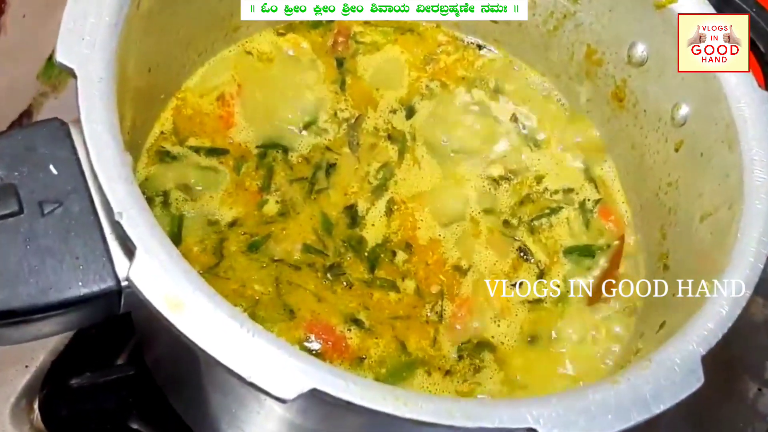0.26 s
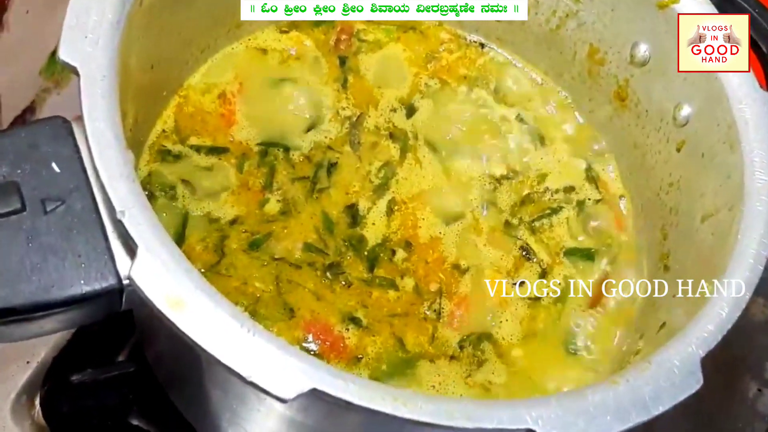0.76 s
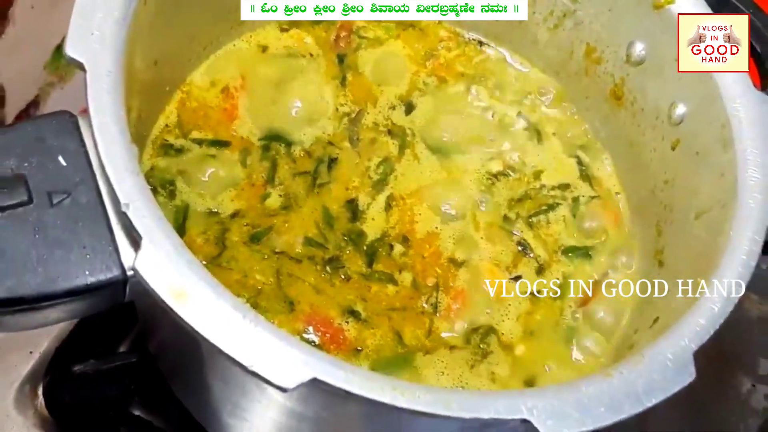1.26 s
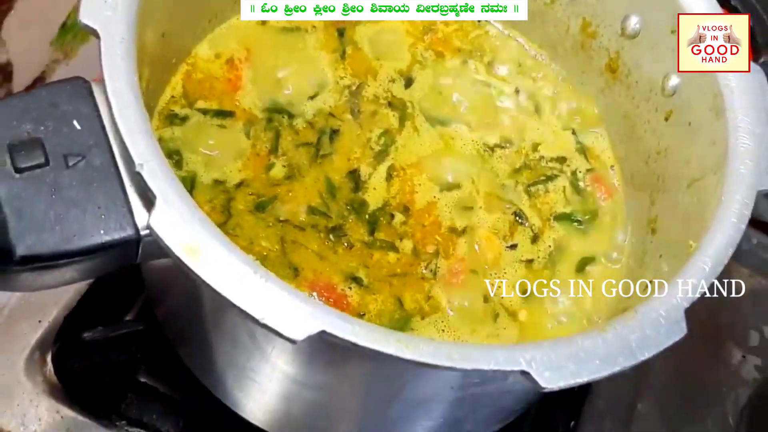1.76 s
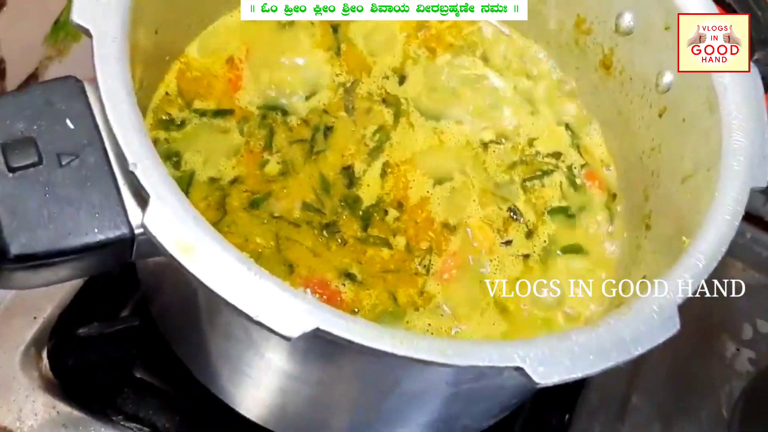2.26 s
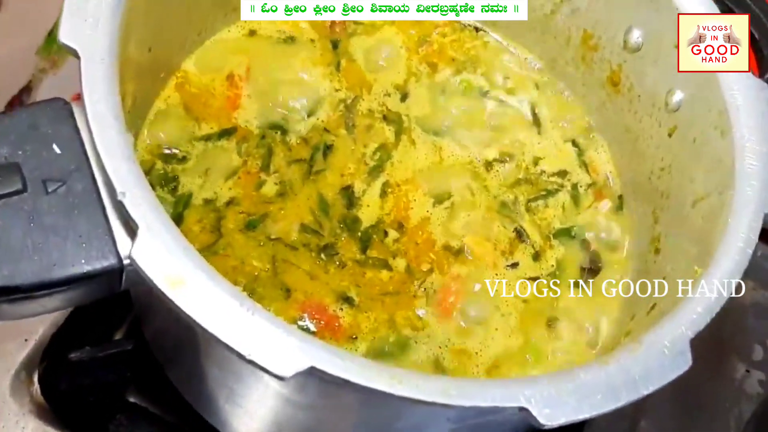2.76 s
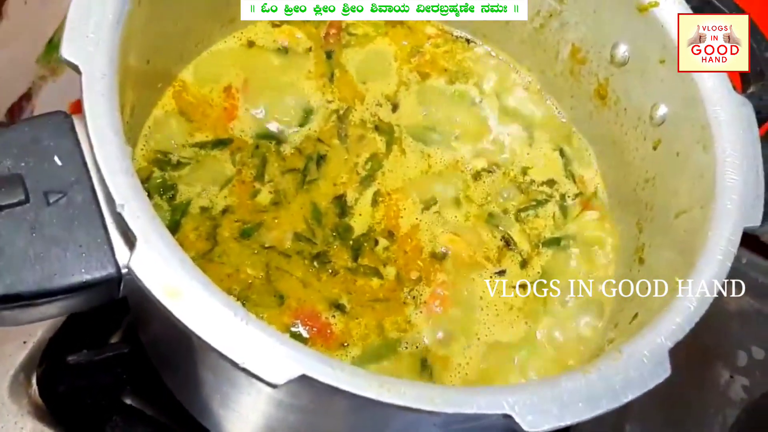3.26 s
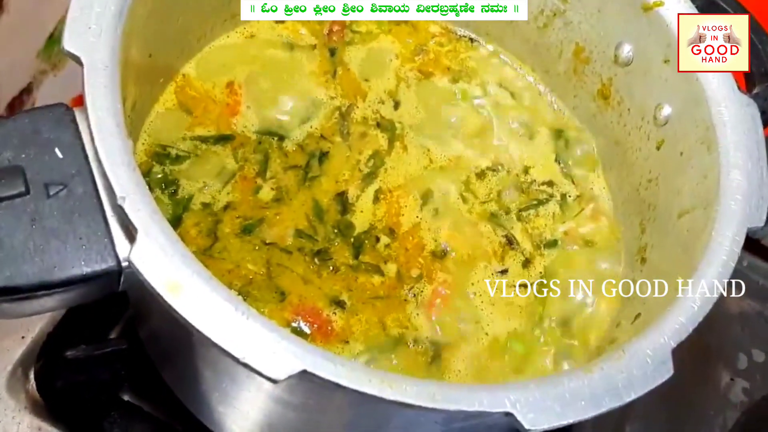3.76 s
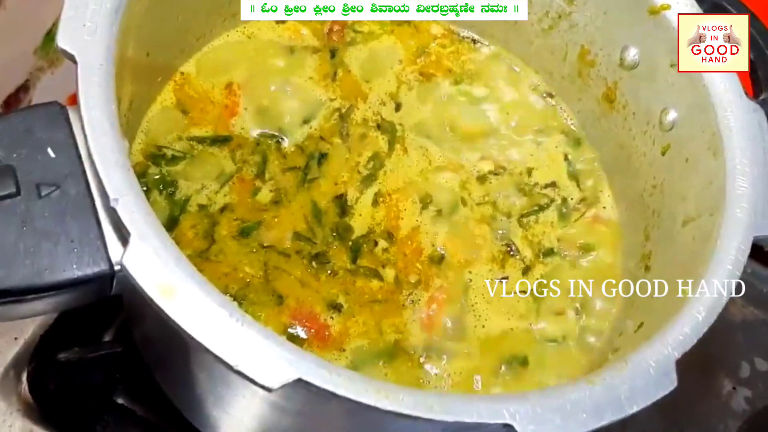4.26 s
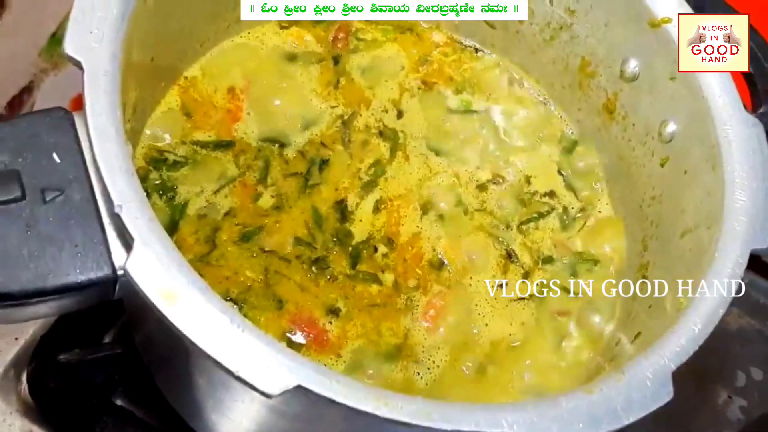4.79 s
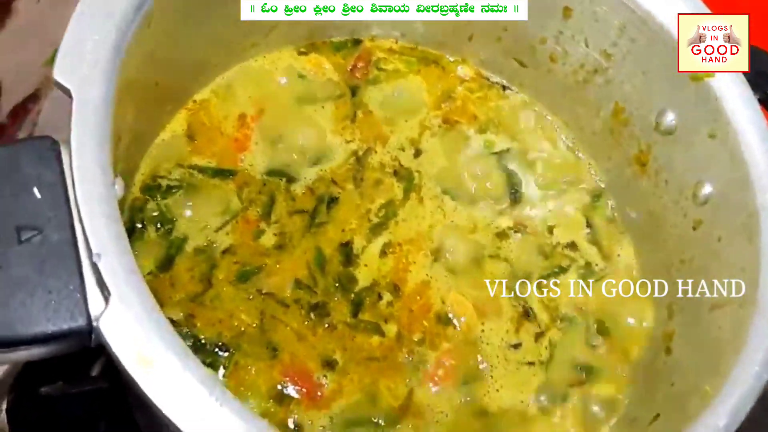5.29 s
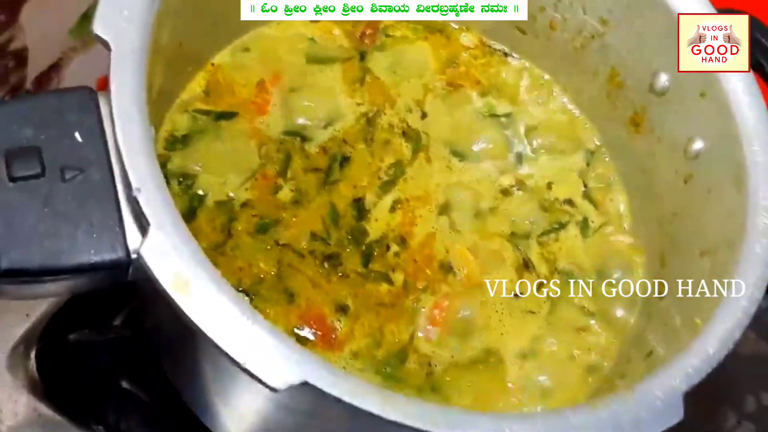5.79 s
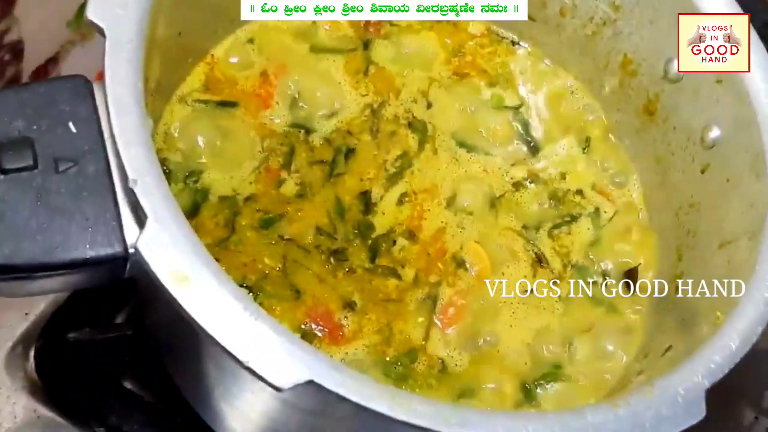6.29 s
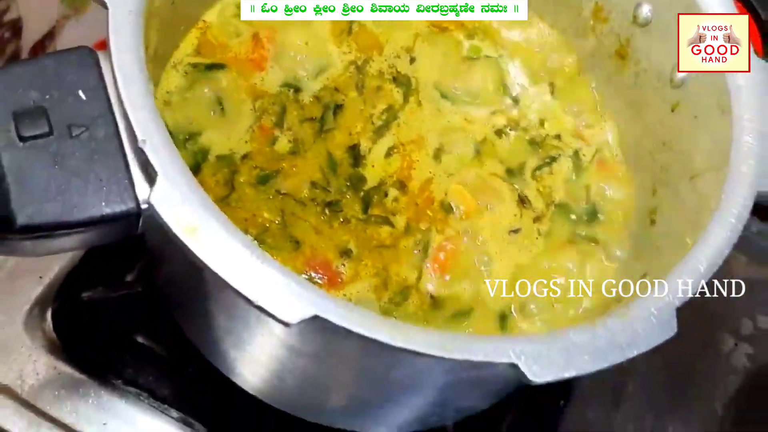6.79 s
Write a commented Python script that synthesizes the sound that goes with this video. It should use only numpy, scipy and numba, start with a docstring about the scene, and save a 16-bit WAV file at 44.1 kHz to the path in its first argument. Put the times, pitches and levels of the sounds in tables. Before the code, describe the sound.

Close up, thick soup bubbles in an open metal pot: hollow mid-pitched pops, rounded plops and tiny bright ticks, dense and irregular, with fine spatter. A faint gas and steam hiss and low rumble lie beneath. A light scrape comes at about one and a half seconds, a loud metallic clack near three, a softer knock shortly after and another around four and a half. Small dry kitchen, stereo phone.

```python
"""In a kitchen, thick soup simmers in an open metal pot under a phone with two microphone ports.
Bursting bubbles ring the air in the pot, middling ones plop and small ones tick, as rising decaying sines.
Drops spatter as short puffs of noise; a gas flame and steam hiss as flickering noise over a far rumble.
Nearby something is knocked and dragged: rattling noise in five registers, and ringing kitchenware modes."""
import sys
import numpy as np
from scipy import signal
from scipy.fft import rfft, irfft
from scipy.io import wavfile
from scipy.ndimage import uniform_filter1d
from numba import njit

SR = 44100
rng = np.random.default_rng(int(sys.argv[2]) if len(sys.argv) > 2 else 0)


def pcm_store(signal):
    """Save signal as 16-bit PCM."""
    levels = np.round(np.clip(np.atleast_2d(signal), -1, 1) * 32767)
    wavfile.write(sys.argv[1], SR, levels.astype(np.int16).T)


N = 310419
TIME = np.arange(N) / SR
FREQ = np.fft.rfftfreq(N, 1 / SR) + 1  # 1 Hz is added so that the logarithm stays finite

# How the scene swells and fades: start_s, rumble_db, boil_db
SWELL = [(0.0, -45.5, 1.5), (0.23, -49.5, 0.5), (1.31, -50.5, 2.5), (1.49, -50, 5.5), (2.08, -49.5, -1),
         (2.25, -51, 3), (3.04, -47.5, 3), (3.18, -54, 3), (3.29, -51, 6), (3.84, -50.5, 2),
         (4.29, -47.5, 3), (4.45, -47.5, 5), (5.0, -46.5, 6), (5.16, -48.5, 5.5), (5.65, -48.5, 1.5),
         (6.08, -52, 1), (6.68, -47, 3), (7.04, -51.5, 2)]

# Colour of the flame and steam hiss: pitch_hz, relative_level_db
HISS_COLOUR = [(150, -42), (250, -10), (519, -4.5), (775, -2), (1120, -26), (1550, -10.5), (1820, -21),
               (7440, -29.5), (7980, -30), (8550, -48.5), (11100, -29.5), (16000, -32)]
HISS_DB = -45.5
# Room modes that colour the far rumble: pitch_hz, width_hz, relative_level_db
RUMBLE_MODES = [(83, 74, 1.5), (152.3, 5.7, -6), (229.3, 29, 2.5)]
# How alike the noise is at the two ports: pitch_hz, correlation
LIKENESS = [(60, 0.97), (500, 0.88), (900, 0.83), (1400, 0.04), (15000, 0.016)]
# How the noise leans to the left: pitch_hz, left_minus_right_db
NOISE_LEAN = [(60, -1), (400, 3), (1300, 3), (2500, 9.5), (5000, 2), (9000, -3), (15000, 2.5)]

# Big bubbles: start_s, first_mode_db, then relative to it low_gulp_db, second_mode_db, bright_snap_db
BIG_BUBBLES = [(0.0075, -15, -16, -17, -13.5), (0.0141, -18, -5.5, 5.5, -8.5),
               (0.2638, -19, -24, -4.5, -14), (0.2828, -18, -12, -11, -33), (0.4235, -24, -21, -10, -16),
               (0.5166, -23, -19, -29, -30), (0.571, -40, -11, 18.5, -1), (0.5919, -15, -27, -14, -11.5),
               (0.7856, -29.5, 0, -1, -0.5), (0.8213, -19.5, -28, -11, -31), (0.8321, -30.5, -2, 17.5, 4.5),
               (0.846, -22, -13, -34, -36), (0.9273, -21, -28, 4, -13), (0.949, -20, -18, -9, -18),
               (1.1332, -22, -4, -15, -22), (1.1847, -25.5, 3.5, 5.5, -12), (1.2145, -23.5, -11, -21, -26),
               (1.3824, -20.5, -18, -27, -34), (1.3953, -27, -26, 11, -3), (1.4135, -18.5, -35, -27, -37),
               (1.4576, -21.5, -16, -16, -28), (1.482, -21, -21, -19, -31), (1.9849, -22, -20, -21, -25),
               (2.0862, -26.5, -4, 6, -2), (2.3756, -26, -16, 21, -1), (2.4934, -21, -27, -36, -44),
               (2.609, -32, -19, 9.5, -2), (2.634, -17, -23, 2.5, -13.5), (2.763, -39.5, -18, 12, 1),
               (3.0805, -25, -32, -3, -19), (3.3714, -22.5, -7, -14, -29), (3.6095, -19.5, -5, -13, -28),
               (3.6904, -24, -11, -12, -16), (3.8884, -24, -25, -1.5, -14), (4.0002, -17.5, -22, -10, -29),
               (4.0148, -15.5, -24, -11, -22), (4.0871, -20, -7, -8.5, -15.5), (4.229, -22, -10, -29, -34),
               (4.2455, -26.5, -22, 9, 1), (4.2521, -28, -20, 6.5, -6), (4.3205, -22, -2, -7, -24),
               (4.4275, -22, -29, -26, -28), (4.4343, -28.5, -16, 6.5, -11), (4.5897, -19.5, -3, -15, -28),
               (4.7438, -12, -13, -21, -23), (4.8092, -22, -25, -25, -34), (4.84, -16, -23, 11, -5.5),
               (4.8542, -22.5, -21, 8, -4), (4.9955, -19.5, -22, -11, -29), (5.0033, -13, -22, -9, -26),
               (5.1349, -19.5, -9, -14, -16), (5.6574, -25.5, -3.5, -7, -10), (5.6926, -14, -19, -19, -24),
               (6.0125, -22, -8, -13, -24), (6.0203, -17.5, -21, -17, -20), (6.056, -25.5, -10, 5.5, -5),
               (6.073, -28, -19, -7, -12), (6.1265, -21.5, -4, -4, -15), (6.216, -31, -16, -21, -26),
               (6.2504, -17, -2.5, -16, -29), (6.2565, -19, -18, -22, -29), (6.4388, -31, 10, 0, -13),
               (6.4495, -23, -22, -10, -25), (6.471, -22, 3.5, -17, -27), (6.6026, -25, -13, 8.5, -8),
               (6.7105, -32, -12, 6, -1), (6.8345, -23.5, -29, 0, -9), (6.9706, -23.5, -3, -25, -30),
               (6.9981, -28, 6.5, -11, -14)]
# Modes of the air in the pot, before scatter:
# pitch_hz, t60_s, relative_level_db (left port), left_minus_right_db, right_lag_rad
POT_MODES = [(769.2, 0.031, -3, 2.5, 0.41), (829, 0.055, -15.5, 7, 0.26), (976, 0.005, -7, 6.5, 0.04),
             (437, 0.025, -5, 1.5, 0.61), (550.6, 0.032, -6, 8.5, 1.5), (1480, 0.009, -4, 9.5, 3.87),
             (1540.4, 0.044, -3.5, 13, 3.7), (1772, 0.0043, -8, 1, 0.95), (1298, 0.026, -2.5, 32, 0.47),
             (2037, 0.049, -7, 8, 0.62), (2440, 0.014, 0.5, 18, 1.4), (2767, 0.019, -8.5, 8, 0.89)]
# Group of each pot mode: 0 first mode, 1 low gulp, 2 second mode, 3 bright snap
MODE_GROUP = [0, 0, 0, 1, 1, 2, 2, 2, 3, 3, 3, 3]
# How much each group's modes scatter from burst to burst (half as much for big bubbles): scatter_db
MODE_SCATTER_DB = [2, 3, 2.5, 5]
SIMMER_PER_S = 220
BURST_RISE_S, SIMMER_RISE_S = 0.005, 0.0098  # t60 of the push: strong bursts break sharply, weak ones softly
SOFT_DB, SHARP_DB = -26, -13  # burst levels between which the push shortens
DETUNE, DAMPING_DB = 0.013, 1  # the heaving surface shifts pitch (fraction) and decay from burst to burst

# Sizes of spattering drops, coarse to fine: low_hz, high_hz, random_puff_db, t60_s
DROP_SIZES = [(1900, 4330, -59.5, 0.087), (2900, 5540, -63.5, 0.067), (4870, 10900, -64, 0.016)]
# Fine spits of drops on the hot wall: start_s, peak_db
SPITS = [(0.073, -32.5), (0.1032, -34), (0.176, -33), (0.321, -37), (0.421, -32), (0.683, -32),
         (1.8851, -34), (2.151, -40), (2.48, -31), (2.5275, -32.5), (2.5666, -35), (3.3972, -33.5),
         (3.648, -32), (3.7806, -35.5), (4.3016, -33), (4.6748, -36.5), (4.764, -31.5), (5.005, -37),
         (5.0265, -30.5), (5.678, -35), (5.926, -32), (6.0412, -35.5), (6.3395, -28.5)]
# Drops relative to the tick they come with: other_sizes_db, same_size_db
TICK_SPRAY_DB = [-15.5, -13.5]
RANDOM_PUFFS_PER_S, PUFF_RISE_T60_S = 30, 0.0043
SPIT_CREST_DB = 8  # peak of a spit above its rms

# Middling bubbles that plop: start_s, level_db (midway between ports), starting_pitch_hz
PLOPS = [(0.5908, -23.5, 1070), (0.9238, -24.5, 1290), (2.0858, -19.5, 1330), (2.3762, -31, 1470),
         (2.6316, -32, 1420), (4.2522, -21, 1080), (4.837, -16.5, 920), (6.0192, -27, 940),
         (6.6009, -20, 1020)]
PLOP_S, PLOP_GLIDE, PLOPS_PER_S = 0.0026, 0.11, 43  # glide: fraction of pitch gained in one PLOP_S

# Small bright bubbles: start_s, level_db (midway between ports), starting_pitch_hz
TICKS = [(0.9705, -37.5, 5400), (1.0425, -35, 2280), (1.098, -36.5, 3980), (1.841, -32, 2420),
         (1.8663, -36, 3300), (2.2838, -34.5, 3500), (2.554, -33.5, 4360), (2.624, -34, 2760),
         (3.1092, -30.5, 2400), (3.569, -39.5, 5240), (4.16, -36.5, 2580), (4.2845, -35, 2360),
         (4.3485, -37, 2550), (4.6632, -35, 2400), (4.76, -35, 4530), (4.785, -33.5, 2400),
         (4.821, -36, 2780), (4.901, -32, 2330), (4.9928, -32, 2130), (5.025, -34.5, 4630),
         (5.05, -41, 3920), (5.1562, -37.5, 3190), (5.456, -35, 2400), (5.5335, -32, 2390),
         (5.9444, -35.5, 2410), (5.963, -34.5, 2420), (6.0975, -40, 3170), (6.137, -42, 4050),
         (6.225, -40, 2870), (6.327, -36, 3200), (6.6296, -37.5, 4600), (6.792, -38.5, 4020)]
FIZZ_PER_S = 260
TICK_PAN_DB, TICK_PAN_SPREAD_DB = 9, 9  # left minus right

# Dragging strokes: start_s, length_s, rasp_db, brightness_db_per_register, ring_db, rubbed_pitch_hz
DRAGS = [(1.424, 0.097, -48.5, 1, -57, 3330), (1.473, 0.081, -40.5, 1.5, -48, 3000),
         (1.53, 0.06, -43.5, 1, -39.5, 3120), (1.561, 0.065, -35.5, -1, -42, 2400),
         (1.595, 0.072, -47.5, -1, -54, 3800), (1.658, 0.046, -44.5, -4, -51, 2080),
         (1.683, 0.036, -52, -4, -51, 3500), (3.216, 0.047, -40.5, -2.5, -52, 3300),
         (6.372, 0.079, -56.5, -2.5, -45, 1670), (6.376, 0.12, -54, 0, -46.5, 2700),
         (6.432, 0.12, -54, 0.5, -54, 1640)]
# Colour of the rasp: thud_db, body_db, middle_db, upper_middle_db, treble_db
DRAG_COLOUR_DB = [-11.5, -7.5, -1, -3.5, -8]
STROKE_PEAKINESS = 1.28  # power on the half-sine swell of a stroke

# Knocks and their bounces, as rattle: start_s, level_db, base_t60_s, brightness_db_per_register
KNOCKS = [(2.9517, -11.5, 0.18, 3), (3.012, -34, 0.17, -1), (3.252, -25, 0.16, 0),
          (4.518, -17.5, 0.095, 4.5), (4.555, -39, 0.091, 4.5)]
# Colour of a knock: thud_db, body_db, middle_db, upper_middle_db, treble_db
KNOCK_COLOUR_DB = [-11.5, -11, -5, -9.5, -14.5]
# Factor on the base t60, so that lows last and treble fades sooner: one factor per register
RING_LONGER = [2.26, 1.26, 1.06, 1.2, 1.05]
KNOCK_RISE_PER_T60 = 0.046

# Single blows within the clatter: start_s, level_db, struck_pitch_hz
BLOWS = [(2.9298, -34.5, 2570), (2.956, -18.5, 510), (2.9605, -34, 2300), (2.9635, -11.5, 4430),
         (2.968, -13.5, 2370), (2.974, -16, 4300), (2.982, -19.5, 560), (2.9973, -30, 3600),
         (3.0162, -26, 3500), (3.021, -31, 1700), (3.033, -36, 3300), (3.047, -35, 3300),
         (3.063, -43, 4900), (3.2412, -39, 3320), (3.254, -23.5, 522), (3.2565, -17, 1350),
         (3.26, -27, 2090), (3.264, -38, 3300), (3.276, -28.5, 1900), (3.292, -36, 545),
         (4.5213, -22.5, 555), (4.5245, -12.5, 3250), (4.527, -17, 2050), (4.533, -24, 1650),
         (4.538, -21, 1340), (4.556, -29, 550), (4.563, -38, 2980)]
# Kitchenware modes: pitch_hz, width_hz, relative_level_db
WARE_MODES = [(439.7, 5.4, 0), (545, 34, 2.5), (1360, 40, -6.5), (1648, 30, 2.5), (2047, 16, -7),
              (2106, 46, 3), (2350, 31, 2.5), (2796, 25, 1.5), (3360, 51, 4.5), (3630, 82, -3),
              (4010, 66, 1), (4170, 39, -8.5), (4440, 39, -1.5), (5060, 96, -16)]
BLOW_OCTAVES, BLOW_SCATTER_DB = 0.17, 1  # reach around the struck pitch; scatter of each mode from blow to blow
WARE_PAN_DB, WARE_RING_DB = 9.5, -11  # left minus right; ringing against the rattle
RATTLE_ALIKE = 0.5  # share of the rattle that reaches both ports alike

# Dips of the microphone ports: pitch_hz, width_hz, depth (0 to 1)
PORT_DIPS = [(8440, 830, 1), (9210, 1370, 0.52)]
LEFT_LAG = 7  # samples by which near sounds reach the left port later
ROOM_T60_S, ROOM_DB = 0.062, -10.5
TOP_HZ = 15500


def undb(db):
    """Decibels to amplitude."""
    return 10 ** (np.asarray(db) / 20)


def unit(x):
    """Scale to an rms of one."""
    return x / np.sqrt(np.mean(x ** 2))


def decay_rate(t60):
    """Loss per sample of a sound that falls by 60 dB in t60 seconds."""
    return np.log(1000) / (t60 * SR)


def on_log(table):
    """Read a table of pitch and value at every frequency bin, on a logarithmic pitch scale."""
    hz, value = np.transpose(table)
    return np.interp(np.log(FREQ), np.log(hz), value)


def band(x, lo_hz, hi_hz):
    """Keep one band of a sound."""
    return signal.sosfilt(signal.butter(2, [lo_hz, hi_hz], "band", fs=SR, output="sos"), x)


def ring(x, hz, t60):
    """One decaying mode, complex so that each port can take its own phase."""
    return signal.lfilter([1], [1, -np.exp(2j * np.pi * hz / SR - decay_rate(t60))], x)


def walk(rate):
    """Random levels held for 1 / rate seconds, then smoothed twice."""
    hold = int(SR / rate)
    steps = np.repeat(rng.standard_normal(N // hold + 1), hold)
    return uniform_filter1d(uniform_filter1d(steps, hold), hold)[:N]


def scatter(per_s, columns):
    """Random moments with random traits; the first trait is a size, rarely large."""
    chance = rng.random((int(per_s * N / SR), columns)).T
    size = np.minimum(-np.log(chance[1]), 3.0)
    return chance[0] * N / SR, size, chance[2:]


def train(s, size):
    """Impulses of these sizes at these moments."""
    return np.bincount((s * SR).astype(int), size, N)


def pair_of_noises():
    """Spectra of left and right noise, alike in the bass and almost unrelated in the treble."""
    mid, side = rfft(rng.standard_normal((2, N)))
    alike, lean = on_log(LIKENESS), undb(on_log(NOISE_LEAN) / 2)
    mid, side = mid * np.sqrt(1 + alike), side * np.sqrt(1 - alike)
    return np.array([(mid + side) * lean, (mid - side) / lean])


def flame_and_steam():
    """Hiss of flame and steam: noise in overlapping octave-spaced bands that each flicker alone."""
    spectrum = pair_of_noises() * undb(on_log(HISS_COLOUR)) * FREQ / (FREQ + 100)
    hiss = 0
    for octave in range(3, 11):
        share = np.clip(1 - abs(np.log2(FREQ / 16) - octave), 0, 1)
        hiss = hiss + irfft(spectrum * share, N) * undb(2.8 * walk(14))
    return unit(hiss) * undb(HISS_DB)


def far_rumble(rumble_db):
    """Low noise that excites the room's low modes; its level swells and fades."""
    far = unit(band(irfft(pair_of_noises(), N), 60, 420))
    modes = sum(undb(db) * unit(ring(far, hz, 1.96 / width).imag) for hz, width, db in RUMBLE_MODES)
    return unit(far + modes) * undb(rumble_db)


@njit
def bursts(start, hz, t60, rise, left, right, n, rate):
    """Each burst pushes briefly on a mode of its own pitch and decay."""
    out = np.zeros((2, n))
    for g in range(len(start)):
        turn = 2j * np.pi * hz[g] / rate
        mode_step = np.exp(turn - np.log(1000) / (t60[g] * rate))
        push_step = np.exp(turn - np.log(1000) / (rise[g] * rate))
        push, mode = np.log(1000) / (rise[g] * rate) + 0j, 0j
        for i in range(start[g], min(start[g] + int((t60[g] + rise[g]) * rate), n)):
            mode = mode * mode_step + push
            push *= push_step
            out[0, i] += mode.imag * left[g]
            out[1, i] += (mode * right[g]).imag
    return out


def pot_bubbles(boil_db):
    """Every burst pushes the pot modes; where it bursts sets how hard and how soon each one is struck."""
    s, first_db, *above_db = np.transpose(BIG_BUBBLES)
    listed_db = first_db + np.array([0 * s, *above_db])

    # each big crater collapses in three smaller bursts right after
    after = rng.random((len(s), 2, 3)).T
    after_s = (s + 0.004 + 0.03 * after[:, 0]).ravel()
    after_db = np.tile(listed_db, 3) - 15 - 12 * after[:, 1].ravel()

    # weaker bursts at random moments, their four groups of modes each with its own level
    t, size, trait = scatter(SIMMER_PER_S, columns=6)
    group_db = np.array([[-43], [-48], [-55], [-60]])
    simmer_db = 3.26 * size + group_db + 14 * (trait - 0.5) + boil_db[(t * SR).astype(int)]

    at = np.r_[s, after_s, t]
    level_db = np.hstack([listed_db, after_db, simmer_db])[MODE_GROUP]
    big = np.arange(len(at)) < len(s)
    lean, late, tune, damp = rng.standard_normal((len(at), len(POT_MODES), 4)).T
    hz, t60, mode_db, pan_db, lag = np.transpose(POT_MODES)[:, :, None]
    place_db = np.array(MODE_SCATTER_DB)[MODE_GROUP, None] * lean * np.where(big, 0.5, 1)
    left = undb(level_db + mode_db + place_db)
    right = left * undb(-pan_db) * np.exp(-1j * lag)
    start = ((at + 0.0001 * abs(late)) * SR).astype(np.int64)
    rise = np.interp(level_db, [SOFT_DB, SHARP_DB], [SIMMER_RISE_S, BURST_RISE_S])
    traits = start, hz * (1 + DETUNE * tune), t60 * undb(DAMPING_DB * damp), rise, left, right
    return bursts(*(v.ravel() for v in traits), N, 1. * SR)


def spray():
    """Short puffs of spattering drops, as band noise: coarser sizes with each tick, fine spits, and at random."""
    tick_s, tick_db, tick_hz = np.transpose(TICKS)
    spit_s, spit_db = np.transpose(SPITS)
    other_db, same_db = TICK_SPRAY_DB
    noise, out = irfft(pair_of_noises(), N), 0
    for lo_hz, hi_hz, level_db, t60 in DROP_SIZES:
        t, size, _ = scatter(RANDOM_PUFFS_PER_S, columns=2)
        if hi_hz > 9000:  # only the finest drops spit
            listed = train(spit_s, undb(spit_db - SPIT_CREST_DB))
        else:
            same_size = (lo_hz < tick_hz) & (tick_hz < hi_hz)
            listed = train(tick_s, undb(tick_db + np.where(same_size, same_db, other_db)))
        pushes = train(t, undb(level_db + 4.3 * size)) + listed
        # a mode at 0 Hz is a plain decay: one softens the onset, one lets the puff die away
        soft = ring(pushes, 0, PUFF_RISE_T60_S) * decay_rate(PUFF_RISE_T60_S)
        out = out + unit(band(noise, lo_hz, hi_hz)) * ring(soft, 0, t60).real
    return out


@njit
def grains(start, hz, cycles, size, glide, n):
    """Decaying sines that rise in pitch as the bubble opens."""
    out = np.zeros((2, n))
    for g in range(len(start)):
        length = int(cycles[g] * SR / hz[g])
        phase = 0.
        for i in range(min(4 * length, n - start[g])):
            phase += 2 * np.pi * hz[g] * (1 + glide * i / length) / SR
            v = np.sin(phase) * np.exp(-2 * i / length)
            out[0, start[g] + i] += v * size[0, g]
            out[1, start[g] + i] += v * size[1, g]
    return out


def plops(boil_db):
    """Middling bubbles whose pitch rises as they open: the loud ones as listed, fainter ones between."""
    t, size, trait = scatter(PLOPS_PER_S, columns=3)
    faint_db = -56 + 2.9 * size + boil_db[(t * SR).astype(int)]
    faint = [t, faint_db, 900 * 2.15 ** trait[0]]
    s, db, hz = np.hstack([np.transpose(PLOPS), faint])
    gain = undb(db + np.array([[4.], [-4.]]))  # left, right
    return grains((s * SR).astype(np.int64), hz, hz * PLOP_S, gain, PLOP_GLIDE, N)


def ticks(boil_db):
    """Small bubbles, as brief rising sines: the loud ones as listed, a fizz of fainter ones between."""
    t, size, trait = scatter(FIZZ_PER_S, columns=3)
    fizz_db = -60.5 + 5.0 * size + boil_db[(t * SR).astype(int)]
    fizz = [t, fizz_db, 1800 * 11.6 ** trait[0] ** 1.45]
    s, db, hz = np.hstack([np.transpose(TICKS), fizz])
    length_s = np.r_[np.full(len(TICKS), 0.0035), np.full(len(t), 0.0015)]
    pan_db = TICK_PAN_DB + TICK_PAN_SPREAD_DB * (rng.random(len(s)) - 0.5)
    gain = undb(db + np.array([pan_db, -pan_db]) / 2)
    return grains((s * SR).astype(np.int64), hz, hz * length_s, gain, 0.057, N)


def drag_strokes():
    """Rough strokes that swell and fade: their rasp in five registers, and how they rub the kitchenware."""
    step, shape, rub = np.arange(5) - 2, np.zeros((5, N)), []
    roughness = undb(1.2 * walk(90))
    for s, length, db, bright_db, ring_db, centre_hz in DRAGS:
        swell = np.sin(np.pi * np.clip((TIME - s) / length, 0, 1)).clip(0)
        stroke = swell ** STROKE_PEAKINESS * roughness
        shape += undb(db + bright_db * step + DRAG_COLOUR_DB)[:, None] * stroke
        rub.append((centre_hz, undb(ring_db) * stroke))
    return shape, rub


def knock_decays():
    """Each knock rises fast and dies away, at its own pace in each of five registers."""
    step, shape = np.arange(5) - 2, np.zeros((5, N))
    for s, db, t60, bright_db in KNOCKS:
        t, rise = np.maximum(TIME - s, 0), KNOCK_RISE_PER_T60 * t60
        register_t60 = np.multiply(t60, RING_LONGER)[:, None]
        decay = 1000 ** (-np.maximum(t - rise, 0) / register_t60)
        blow = np.minimum(t / rise, 1) ** 2 * decay
        shape += undb(db + bright_db * step + KNOCK_COLOUR_DB)[:, None] * blow
    return shape


def rattle_registers():
    """Steady contact noise, partly ringing in the kitchenware, split into five registers."""
    lean = undb(WARE_PAN_DB / 2 * np.minimum(FREQ / 1500, 1))  # lows reach both ports alike
    left_delay = np.exp(-2j * np.pi * FREQ * LEFT_LAG / SR)
    direct = rfft(rng.standard_normal(N)) * np.array([lean * left_delay, 1 / lean])
    mixed = RATTLE_ALIKE * direct + (1 - RATTLE_ALIKE) * pair_of_noises()
    noise = unit(irfft(mixed / np.sqrt(FREQ + 5000), N))
    rings = sum(undb(db) * unit(ring(noise, hz, np.log(1000) / np.pi / width).imag)
                for hz, width, db in WARE_MODES)
    body = noise + undb(WARE_RING_DB) * unit(rings)
    edges_hz = [(120, 240), (410, 900), (1400, 3000), (3000, 5200), (5000, 15000)]
    # every other register is turned upside down
    return [(-1) ** k * unit(band(body, lo, hi)) for k, (lo, hi) in enumerate(edges_hz)]


def struck_ware(rub):
    """Blows and strokes set ringing the kitchenware modes near their own pitch."""
    s, db, centre_hz = np.transpose(BLOWS)
    place, out = rng.standard_normal((len(s), len(WARE_MODES))).T, np.zeros((2, N))
    for (hz, width, mode_db), lean in zip(WARE_MODES, place):
        def reach(centre):
            return np.exp(-0.5 * (np.log2(hz / centre) / BLOW_OCTAVES) ** 2)

        push = train(s, undb(db + BLOW_SCATTER_DB * lean) * reach(centre_hz))
        rubbing = sum(reach(c) * stroke for c, stroke in rub)
        # the root keeps narrow and wide modes equally loud when rubbed by noise
        push = push + np.sqrt(4 * np.pi * width / SR) * rng.standard_normal(N) * rubbing
        mode = ring(push, hz, np.log(1000) / np.pi / width) * undb(mode_db)
        gain = undb(WARE_PAN_DB / 2 * min(hz / 1500, 1))  # lows reach both ports alike
        right_lead = np.exp(2j * np.pi * hz * LEFT_LAG / SR)
        out += np.array([mode.imag * gain, (mode * right_lead).imag / gain])
    return out


def knocks_and_drags():
    """Rattling noise shaped by knocks and strokes, fluttering in each register, plus the struck modes."""
    drag_shape, rub = drag_strokes()
    shape = drag_shape + knock_decays()
    rattle = sum(e * undb(2.8 * walk(220)) * part for e, part in zip(shape, rattle_registers()))
    return rattle + struck_ware(rub)


def room(x):
    """A short tail of scattered echoes, different at each port."""
    t = np.arange(int(0.3 * SR)) / SR
    tail = rng.standard_normal((2, len(t))) * 1000 ** (-t / ROOM_T60_S) * (t > 0.004)
    tail /= np.sqrt(np.sum(tail ** 2, axis=1, keepdims=True))
    return signal.fftconvolve(x, tail, axes=1)[:, :N] * undb(ROOM_DB)


def scene():
    """Near sounds with their echoes, over the hiss and rumble of the kitchen."""
    s, *columns = np.transpose(SWELL)
    rumble_db, boil_db = (np.interp(TIME, s, c) for c in columns)
    near = pot_bubbles(boil_db) + plops(boil_db) + ticks(boil_db)
    near[0] = np.roll(near[0], LEFT_LAG)
    near = near + spray() + knocks_and_drags()
    return near + room(near) + flame_and_steam() + far_rumble(rumble_db)


def record(dry):
    """The microphone ports dip in the treble; the phone rounds the peaks and cuts the top."""
    for hz, width, depth in PORT_DIPS:
        dry = dry - depth * signal.lfilter(*signal.iirpeak(hz, hz / width, SR), dry)
    rounded = 0.94 * np.tanh(dry / 0.94)
    top_cut = signal.cheby2(16, 70, TOP_HZ + 900, fs=SR, output="sos")
    return signal.sosfilt(top_cut, rounded)


dry = scene()
out = record(dry)
pcm_store(out)
```